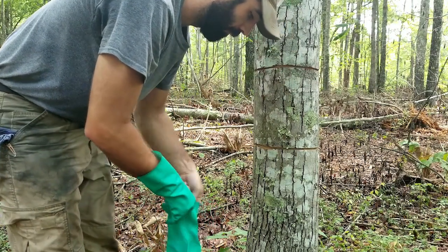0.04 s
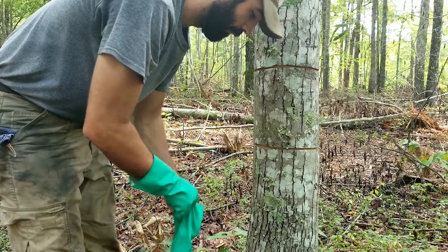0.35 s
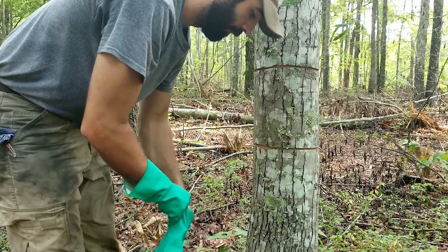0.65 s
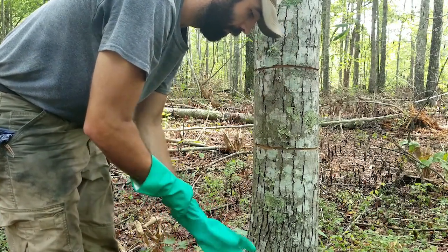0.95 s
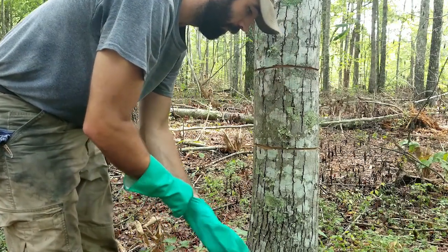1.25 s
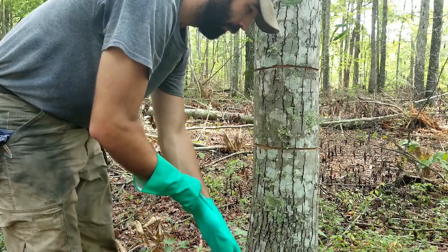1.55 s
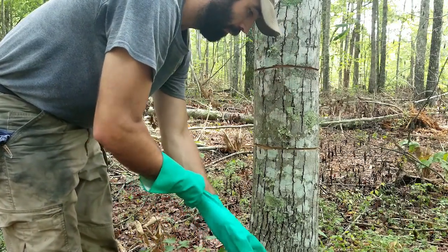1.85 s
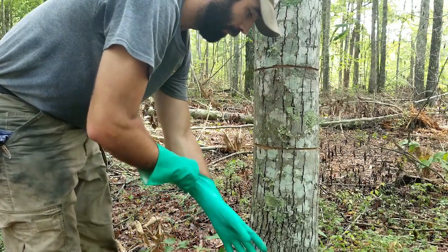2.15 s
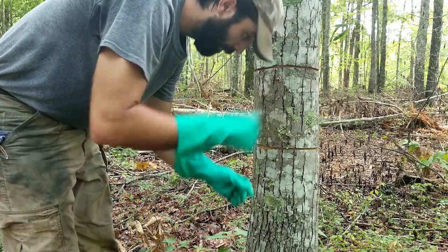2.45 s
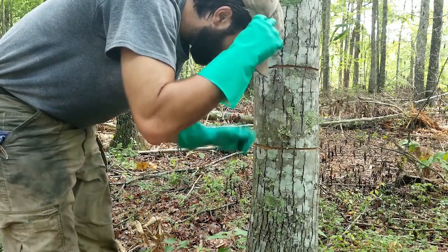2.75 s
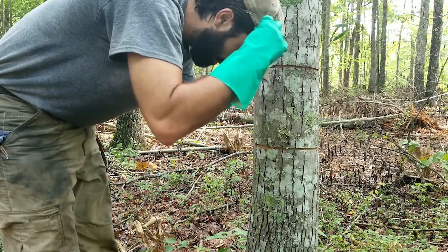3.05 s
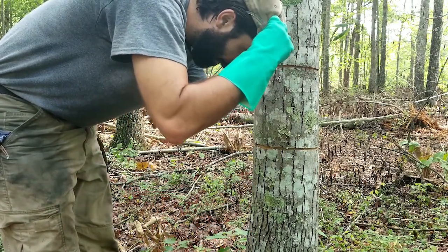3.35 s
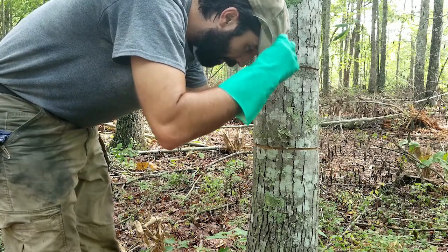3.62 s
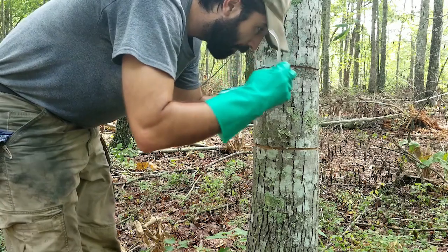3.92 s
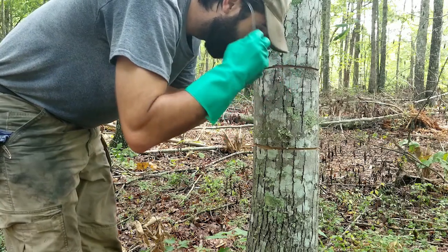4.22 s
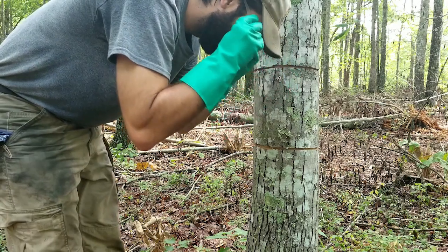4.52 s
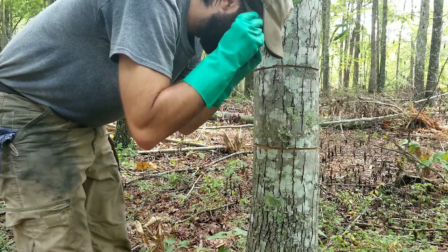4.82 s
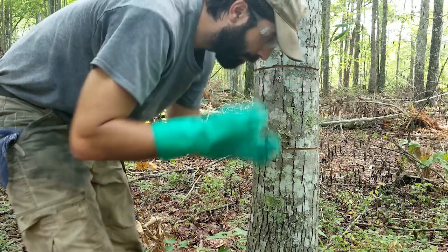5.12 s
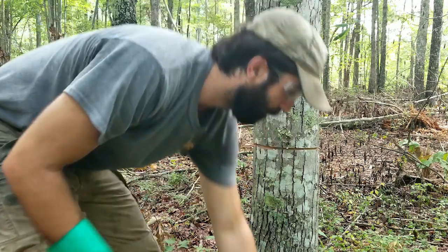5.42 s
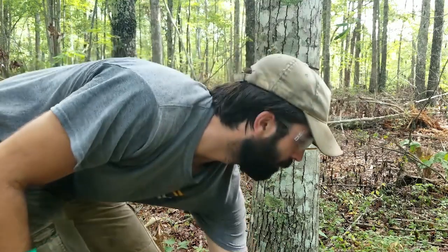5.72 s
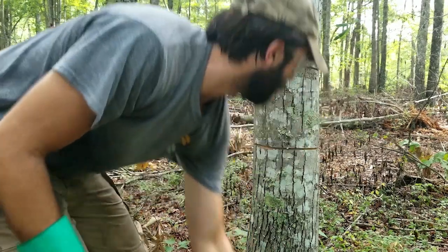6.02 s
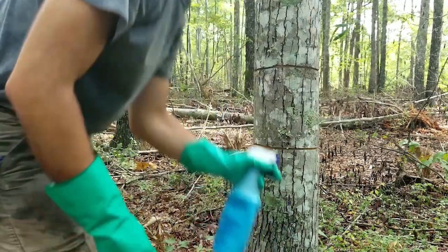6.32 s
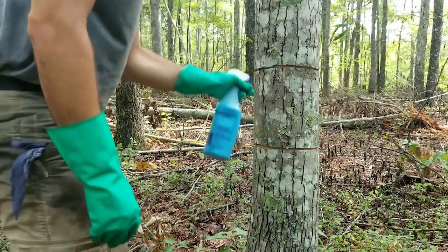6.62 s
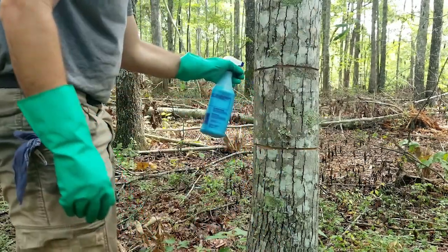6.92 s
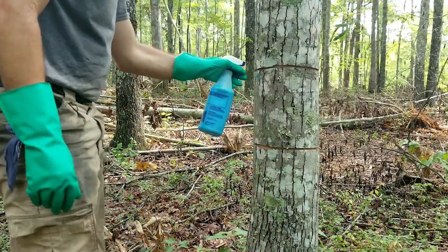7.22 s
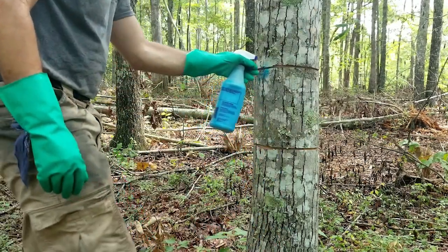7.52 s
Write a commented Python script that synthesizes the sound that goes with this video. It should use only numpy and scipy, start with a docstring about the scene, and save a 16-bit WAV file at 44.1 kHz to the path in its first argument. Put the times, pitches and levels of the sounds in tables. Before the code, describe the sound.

Rubber gloves knock and drag a hollow plastic container, dry leaves rustle and twigs snap, then a spray bottle squirts twice in quiet woods.

```python
"""A hollow plastic container knocks and drags in a man's rubber-gloved hands, close by on a forest floor.
Knocks and slips ring its cavity and walls; squeezes push a thin whistle of air through its cap.
Gloves scuff, dry leaves rustle, twigs snap and the ground thuds as he shifts and bends for a spray bottle.
Two trigger squirts then hiss onto bark as fine droplets, over the low rumble and hiss of the woods."""
import sys
import numpy as np
from scipy import signal
from scipy.fft import rfft, irfft, next_fast_len
from scipy.io import wavfile

SR = 44100
rng = np.random.default_rng(int(sys.argv[2]) if len(sys.argv) > 2 else 0)


def inscribe(sig):
    """Save sig as 16-bit PCM at rate SR to the path in sys.argv[1].

    A 1-D sig is mono; a 2-D sig holds one channel per row.
    Samples are clipped to [-1, 1] before scaling.
    """
    pcm = np.round(np.clip(np.atleast_2d(sig).T, -1, 1) * 32767)
    wavfile.write(sys.argv[1], SR, pcm.astype(np.int16))


N = 337806
TIME = np.arange(N) / SR
# tone of a rough scrape, for plastic and glove alike: f/Hz, level/dB
SCRAPE_TONE = [(150, 4), (440, -1), (700, -12), (950, 4), (1400, 0), (1900, 1.5), (2600, -4.5),
               (14000, -6.5)]


def amp(db):
    """Decibels to gain."""
    return 10 ** (np.asarray(db) / 20)


def unit_rms(x):
    """Scales to rms 1."""
    return x / np.sqrt(np.mean(x ** 2) + 1e-20)


def curve_at(points, hz):
    """Reads a curve on a logarithmic frequency axis."""
    f, value = np.transpose(points)
    return np.interp(np.log(hz + 1), np.log(f + 1), value)


def colour(x, points):
    """Equalises by a curve of f/Hz, level/dB."""
    size = next_fast_len(len(x))
    gain = amp(curve_at(points, np.fft.rfftfreq(size, 1 / SR)))
    return irfft(rfft(x, size) * gain, size)[:len(x)]


def add(mix, s, sound):
    """Mixes a sound in at s seconds."""
    part = mix[max(round(s * SR), 0):][:len(sound)]
    part += sound[:len(part)]


def resonate(x, hz, width_hz):
    """A resonance, steady or gliding."""
    turn = np.exp(2j * np.pi * np.cumsum(hz * np.ones(len(x))) / SR)
    pole = np.exp(-np.pi * width_hz / SR)
    return 2 * (turn * signal.lfilter([1 - pole], [1, -pole], x / turn)).real


def band(x, hz, width_hz):
    """Two like resonances in series, scaled to rms 1."""
    return unit_rms(resonate(resonate(x, hz, width_hz), hz, width_hz))


def wander(size, per_s):
    """Random drift of rms 1."""
    knots = rng.standard_normal(size // 16 + 2)
    return unit_rms(np.interp(np.arange(size) * per_s / SR, np.arange(len(knots)), knots))


def grains(size, per_s, spread_db):
    """Tiny slips and fractures: many small, a few large."""
    heights = amp(spread_db * np.minimum(rng.exponential(1, size), 4))
    return unit_rms(heights * rng.choice([-1, 1], size) * (rng.random(size) < per_s / SR))


def decay(t, t60):
    """Falls 60 dB in t60 seconds."""
    return np.exp(-np.log(1000) * t / t60)


def ring(t, hz, t60):
    """One dying mode that swells within its first half cycle."""
    phase = 2 * np.pi * hz * t
    return np.sin(phase) * decay(t, t60) * (1 - np.exp(-phase))


def swell(start, hold, attack, release):
    """Gain that grows to 1 at start, holds, and dies away."""
    return np.exp(np.minimum(TIME - start, 0) / attack - np.maximum(TIME - start - hold, 0) / release)


def gestures(rows, attack, release):
    """Joint gain of overlapping movements that share one attack and release."""
    return np.sqrt(sum((amp(db) * swell(s, hold, attack, release)) ** 2 for s, hold, db in rows))


def woods(air_db=-56, drift_db=-0.68, sizzle_floor_db=-66):
    """Far rumble, nearly alike on both sides, under a diffuse hiss and a high sizzle."""
    # tone of the forest bed: f/Hz, level/dB
    bed_tone = [(25, -29), (45, -5), (70, 0), (105, -4), (135, -11.5), (380, -16), (1280, -21.5),
                (2500, -24), (4000, -27), (8200, -34), (13000, -29.5), (15000, -56)]
    # stereo likeness: f/Hz, left-right correlation
    likeness = [(60, 0.79), (200, 0.24), (700, 0.14), (2000, 0.058), (12000, 0.031)]
    # stereo balance: f/Hz, left minus right/dB
    balance = [(70, -8), (200, -1.5), (600, -1), (2400, -2.5), (14000, -1)]
    # swells of the sizzle: t/s, level/dB, rise/s, fall/s
    sizzles = [(2.5, -57, 0.39, 0.17), (7.2, -59.5, 1.8, 1.9)]
    size = next_fast_len(N)
    hz = np.fft.rfftfreq(size, 1 / SR)
    common, apart = rfft(rng.standard_normal((2, size)))
    same, pan = curve_at(likeness, hz), curve_at(balance, hz)
    left = same * common + np.sqrt(1 - same ** 2) * apart
    pair = np.array([left * amp(pan / 2), common * amp(-pan / 2)])
    air = irfft(pair * amp(curve_at(bed_tone, hz)), size)[:, :N]
    air *= amp(air_db + drift_db * wander(N, per_s=1.26)) / np.std(air.mean(0))
    sizzle = np.array([band(x, hz=13300, width_hz=4400) for x in rng.standard_normal((2, N))])
    swell_power = sum((amp(db) * swell(s, 0, rise, fall)) ** 2 for s, db, rise, fall in sizzles)
    level = np.sqrt(amp(sizzle_floor_db) ** 2 + swell_power)
    return air + sizzle * level * amp([[-3], [3]])


def container(tick_db=-16, drag_db=-7, judder_db=3, skid_db=-29, skid_s=0.014):
    """Knocks and dragging both ring the cavity and the walls; after each knock the plastic skids on."""
    # knocks on the plastic: t/s, level/dB, cavity f/Hz
    knocks = [(.139, -42, 1000), (.173, -41, 960), (.222, -41.5, 880), (.391, -32, 1070), (.409, -28, 1094),
              (.756, -28.5, 890), (.777, -35, 920), (.872, -34, 1040), (.912, -43, 940), (1.030, -26, 1030),
              (1.0405, -13.5, 930), (1.0535, -24, 895), (1.118, -32, 850), (1.154, -37, 890),
              (1.512, -34.5, 970), (1.575, -36, 940), (1.601, -32, 1020), (1.682, -33.5, 1030),
              (1.735, -36.5, 990), (1.778, -38, 1020), (1.829, -39.5, 1020), (1.876, -37.5, 960),
              (1.956, -35.5, 984), (1.983, -30, 1040), (2.174, -28.5, 920)]
    # wall modes: f/Hz, level/dB, t60/s
    wall_modes = [(456, -13.5, 0.02), (1540, -14.5, 0.0074), (2254, -22, 0.045), (3250, -23.5, 0.019),
                  (4180, -27.5, 0.039), (5400, -28, 0.016)]
    # drags of the container: t/s, length/s, level/dB
    drags = [(.39, 0.24, -51.5), (.76, .14, -49.5), (1.0, 0.14, -47.5), (1.5, 0.12, -49),
             (1.68, 0.17, -52.5), (1.99, .15, -48.5)]
    t, out, skid = np.arange(SR // 10) / SR, np.zeros(N), np.zeros(N)
    wall = sum(amp(db) * ring(t, hz, t60) for hz, db, t60 in wall_modes)
    for s, db, hz in knocks:
        tick = amp(tick_db) * rng.standard_normal(len(t)) * decay(t, t60=0.012)
        # a small opening radiates little bass
        cavity = np.gradient(ring(t, hz, t60=0.03)) * SR / (2 * np.pi * hz)
        add(out, s, amp(db) * (cavity + wall + tick))
        add(skid, s, amp(skid_db + db / 2) * np.exp(-t / skid_s))  # harder knocks skid louder
    slips = grains(N, per_s=870, spread_db=1.5)
    hollow = unit_rms(resonate(resonate(slips, hz=970, width_hz=196), hz=1000, width_hz=330))
    rubbed_wall = amp(-9) * unit_rms(signal.oaconvolve(slips, wall)[:N])
    grit = amp(-7) * unit_rms(colour(slips, SCRAPE_TONE))
    dragging = gestures(drags, attack=0.076, release=0.11)
    dragging *= amp(drag_db + judder_db * wander(N, per_s=53))
    return out + dragging * (hollow + rubbed_wall) + skid * (hollow + grit)


def rustle(leaf_db=1, cloth_db=-4, clump_db=2, settle_db=-8):
    """Dry leaves crackle in clumps while clothes slide; both settle after each shift of the body."""
    # leaf crackle: f/Hz, level/dB
    leaf_tone = [(1200, -31), (2500, 2), (5000, 11.5), (9500, 8.5), (13000, 10.5), (15000, -6)]
    # sliding cloth: f/Hz, level/dB
    cloth_tone = [(60, -13), (180, 0.5), (350, -4.5), (700, -6.5), (1500, -5), (2500, -5.5), (5000, -22.5)]
    # shifts of the body: t/s, length/s, level/dB
    moves = [(.3, 0.19, -56.5), (.64, 0.19, -57.5), (.82, .08, -55), (1.04, 0.16, -59), (1.28, .48, -58.5),
             (1.52, 0.022, -50.5), (2.06, 0.043, -55), (5.125, 0.028, -49.5), (5.23, 0.04, -52.5),
             (5.77, .05, -55), (5.9, .13, -48), (6.11, 0.041, -55.5), (6.25, 0.092, -60), (6.51, 0.23, -54)]
    crackle = colour(grains(N, per_s=6000, spread_db=1.5), leaf_tone)
    leaves = unit_rms(crackle * amp(clump_db * wander(N, per_s=90)))
    cloth = unit_rms(colour(grains(N, per_s=3000, spread_db=3.5), cloth_tone))
    moving = gestures(moves, attack=0.051, release=0.064)
    settling = amp(settle_db) * gestures(moves, attack=0.051, release=0.25)
    return np.hypot(moving, settling) * (amp(leaf_db) * leaves + amp(cloth_db) * cloth)


def glove_scuffs(waver=0.043, smooth_width=0.14, rough_width=0.74):
    """Rubber slips in dense tiny jerks: a wavering squeak that broadens to a scrape on rough strokes."""
    # strokes on bark, plastic or cloth: t/s, rise/s, fall/s, level/dB, centre f/Hz, roughness 0-1
    strokes = [(0.319, 0.016, 0.015, -43.5, 5070, 0.7), (0.652, 0.02, 0.016, -53.5, 1520, 0.1),
               (.824, 0.069, 0.099, -53.5, 3000, 0.37), (.873, .011, 0.013, -42, 1900, 0.74),
               (.915, 0.0034, 0.014, -44.5, 1900, 0.8), (1.031, 0.0041, .0036, -37, 2930, 0.65),
               (1.06, 0.051, 0.093, -47, 2900, 0.11), (2.069, 0.078, 0.034, -50, 1370, 0.31),
               (2.176, .0041, 0.024, -33, 975, .84), (2.1903, 0.004, 0.0061, -26.5, 1800, 0.65),
               (2.235, 0.039, 0.022, -40.5, 3160, 0.57), (2.435, 0.043, 0.035, -49.5, 1900, 0.82),
               (3.81, 0.055, 0.13, -53, 5530, 0.6), (3.845, 0.0042, 0.016, -42, 5220, 0.2),
               (5.676, 0.034, .11, -51.5, 4310, .02), (5.80, 0.035, 0.18, -52.5, 3010, 0.08),
               (5.88, 0.036, 0.03, -51.5, 198, 0.37), (5.97, 0.066, 0.088, -49.5, 4100, 0.26),
               (6.138, 0.0065, .01, -42.5, 12100, 0.16)]
    t, out = np.arange(-SR // 4, SR // 3) / SR, np.zeros(N)
    for s, rise, fall, db, hz, rough in strokes:
        slips = grains(len(t), per_s=7600, spread_db=3.5)
        centre = hz * (1 + waver * wander(len(t), per_s=44.8))
        squeak = band(slips, centre, hz * (smooth_width + rough_width * rough))
        scrape = unit_rms(colour(grains(len(t), per_s=7000, spread_db=0.5), SCRAPE_TONE))
        stroke = np.exp(-(t / np.where(t < 0, rise, fall)) ** 2 / 2)
        add(out, s + t[0], amp(db) * stroke * (np.sqrt(1 - rough) * squeak + np.sqrt(rough) * scrape))
    return out


def cap_whistle(low_hz=11950, fade_s=0.02, trim_db=-6, flutter_db=3):
    """Air leaks through the cap in a thin, unsteady whistle whose pitch follows the pressure."""
    # squeezes of the container: start t/s, hardest t/s, end t/s, top f/Hz, level/dB
    squeezes = [(1.153, 1.25, 1.33, 13140, -53), (1.365, 1.454, 1.66, 13750, -50.5)]
    out = np.zeros(N)
    for start, hardest, end, top_hz, db in squeezes:
        pressure = np.sin(np.pi * np.interp(TIME, [start, hardest, end], [0, .5, 1]))
        pitch = low_hz + (top_hz - low_hz) * pressure
        whistle = band(rng.standard_normal(N), pitch, width_hz=240)
        out += amp(db) * whistle * swell(start + fade_s, end - start - 2 * fade_s, fade_s, fade_s)
    return out * amp(trim_db + flutter_db * wander(N, per_s=40))


def snap(hz, t60, crack_share, patter_db=-25, patter_t60=0.51):
    """A crack and a brief cluster of modes, then a faint patter of what was shaken."""
    t = np.arange(SR // 10) / SR
    crack, patter = (band(x, hz, 3 * hz) / 2 for x in rng.standard_normal((2, len(t))))
    crack *= decay(t, t60)
    patter *= amp(patter_db) * decay(t, patter_t60)
    modes_hz = hz * (1 + 0.066 * rng.uniform(-1.27, 1, size=3))
    cluster = sum(ring(t, f, t60) for f in modes_hz) / 2
    return (1 - crack_share) * cluster + crack_share * crack + patter


def snaps_and_clacks():
    """Twigs mostly crack; hard things mostly ring."""
    # twigs and dry leaves breaking: t/s, level/dB, f/Hz
    twigs = [(1.355, -37.5, 2030), (2.086, -31, 1700), (2.42, -30, 1330), (2.447, -30, 2170),
             (3.981, -34, 2400), (4.009, -32.5, 1420), (4.097, -38, 1480), (5.123, -28, 8800),
             (5.272, -27.5, 1370), (5.532, -38.5, 1510), (5.740, -31, 2160), (5.763, -28, 8050),
             (5.793, -30, 8200), (6.231, -26, 13700), (7.218, -34, 12600), (7.607, -33, 7100)]
    # hard things touching: t/s, level/dB, f/Hz, t60/s
    clacks = [(5.243, -15, 6220, 0.0052), (5.243, -31, 2360, .024), (6.932, -27, 580, 0.006),
              (6.9336, -29.5, 1500, 0.0055)]
    out = np.zeros(N)
    for s, db, hz in twigs:
        add(out, s, amp(db) * snap(hz, t60=0.02, crack_share=0.67))
    for s, db, hz, t60 in clacks:
        add(out, s, amp(db) * snap(hz, t60, crack_share=0.05))
    return out


def thumps():
    """Air and ground thud in low, quickly damped swings."""
    # dull pushes: t/s, level/dB, f/Hz, t60/s
    pushes = [(2.1898, -32, 422, 0.07), (2.189, -38, 312, 0.066), (2.1952, -17.5, 71.6, 0.068),
              (5.273, -42.5, 503, 0.039), (5.568, -38.5, 84, 0.062), (5.801, -44.5, 117, 0.25),
              (6.236, -50, 218, 0.16), (7.329, -39, 72, 0.18)]
    t, out = np.arange(SR // 3) / SR, np.zeros(N)
    for s, db, hz, t60 in pushes:
        add(out, s, amp(db) * ring(t, hz, t60))
    return out


def sprayer(spit_s=0.013, wet_db=-16, wet_s=0.29, delay_drift=0.0013, sputter_db=1.1):
    """A spit clears the nozzle, then the jet breaks into droplets; its hiss bounces off trunk and bottle."""
    # trigger pulls: full flow t/s, hold/s, level/dB, attack/s, release/s, bounce delay/s,
    # spit lead/s, spit level/dB
    squirts = [(7.12, 0.077, -41.5, 0.033, 0.017, 0.001198, 0.055, -43),
               (7.459, .015, -36, 0.038, 0.045, 0.0014, .11, -51.5)]
    # tone of each squirt's hiss: f/Hz, level/dB
    jet_tones = [
        [(400, -24), (1000, -21), (1600, -6), (2400, -4.5), (3400, -6.5), (4500, -4.5), (5750, 6), (6700, 2),
         (8000, 3.5), (9500, -10), (11000, -2), (14500, -1)],
        [(700, -9.5), (1150, -16), (1450, -2.5), (2100, -6), (2700, -15), (3500, -13), (5000, -3), (5650, 6),
         (6900, -3.5), (7600, 4.5), (9300, -6), (13000, -1)],
    ]
    # rough bark returns the mids and diffuses the top: f/Hz, level/dB
    bark_tone = [(2500, -2), (5000, -9), (10000, -14)]
    out = np.zeros(N)
    for (s, hold, db, attack, release, delay, lead, spit_db), tone in zip(squirts, jet_tones):
        fizz = amp(wet_db) * swell(s, hold, attack, wet_s)  # the wetted bark fizzes on
        jet = np.maximum(swell(s, hold, attack, release), fizz)
        spit = np.exp(-((TIME - s + lead) / spit_s) ** 2 / 2)
        mist = colour(grains(N, per_s=16000, spread_db=2.5), tone)
        bounce = colour(mist, bark_tone)
        lag = delay + delay_drift * (TIME - s)  # the comb slides as the hand moves
        combed = mist + np.interp(TIME - lag, TIME, bounce) + np.interp(TIME - 2 * lag, TIME, bounce) / 2
        out += unit_rms(combed) * np.hypot(amp(db) * jet, amp(spit_db) * spit)
    return out * amp(sputter_db * wander(N, per_s=200))


def shaded_side(x):
    """The shaded left microphone hears a weak direct sound and a scattered one with scrambled phase."""
    # direct path: f/Hz, level/dB
    direct_tone = [(100, -9.5), (1000, -16.5), (3000, -25.5), (7000, -19.5), (12000, -27)]
    # scattered paths: f/Hz, level/dB
    scatter_tone = [(300, -14), (1000, -12), (3000, -10), (6000, -16.5), (8400, -17), (9500, -6.5),
                    (12000, -1.5), (14500, -9)]
    frames = signal.stft(x, nperseg=128)[2]
    scattered = signal.istft(frames * np.exp(2j * np.pi * rng.random(frames.shape)))[1][:N]
    return colour(x, direct_tone) + colour(scattered, scatter_tone)


def trunk_echoes(x, t60=0.64):
    """Trunks return sparse reflections that die away."""
    t = np.arange(SR // 2) / SR
    taps = rng.standard_normal(len(t)) * (rng.random(len(t)) < .1) * decay(t, t60)
    return signal.oaconvolve(x, taps / np.linalg.norm(taps))[:N]


def scene(near_db=4, trunks_db=-22):
    """The handling faces the right microphone, with a faint tail from the trunks and the woods all round."""
    handling = container() + snaps_and_clacks() + glove_scuffs() + rustle() + thumps()
    near = amp(near_db) * (handling + sprayer() + cap_whistle())
    pair = np.array([shaded_side(near), near])
    tails = np.array([amp(-4) * trunk_echoes(near), trunk_echoes(near)])
    return pair + amp(trunks_db) * tails + woods()


def record(dry, low_cut_hz=40, high_cut_hz=14700):
    """A gentle low cut and a steep high cut."""
    dry = signal.sosfilt(signal.butter(2, low_cut_hz, "high", fs=SR, output="sos"), dry)
    high_cut = signal.firwin(511, high_cut_hz, window=("kaiser", 8), fs=SR)
    return signal.oaconvolve(dry, high_cut[None], "same")


dry = scene()
out = record(dry)
inscribe(out)
```